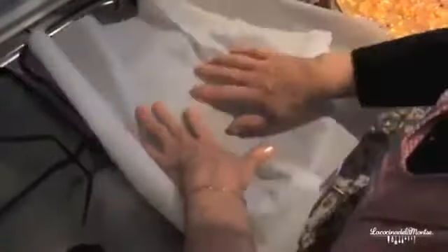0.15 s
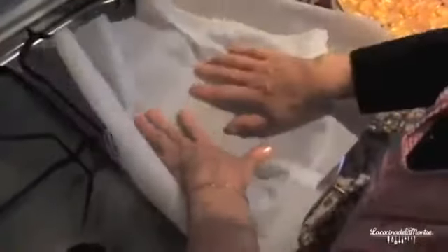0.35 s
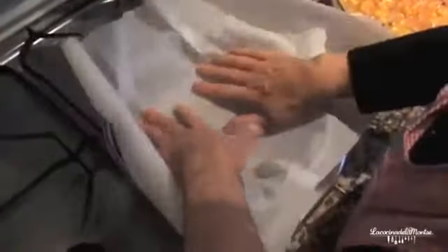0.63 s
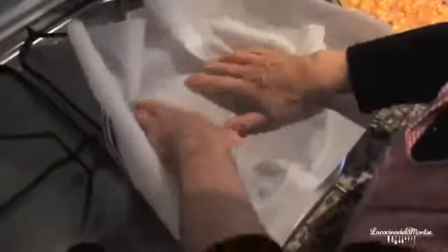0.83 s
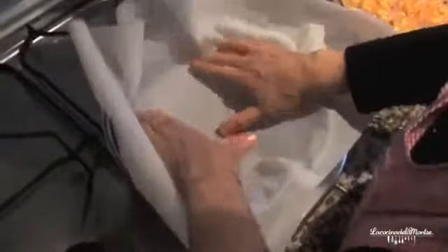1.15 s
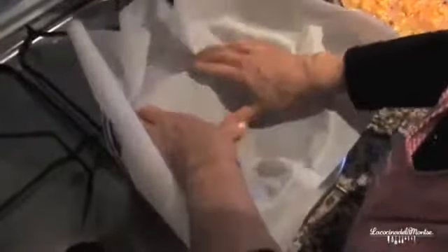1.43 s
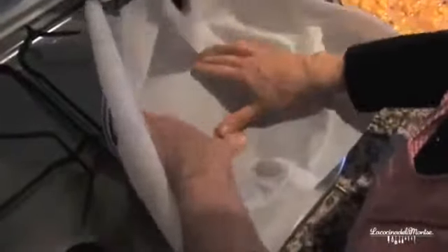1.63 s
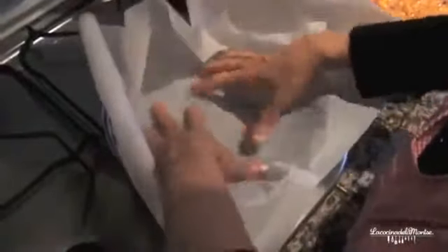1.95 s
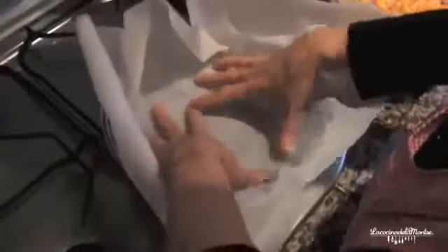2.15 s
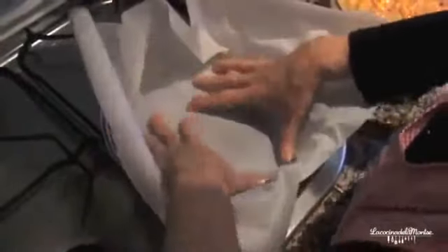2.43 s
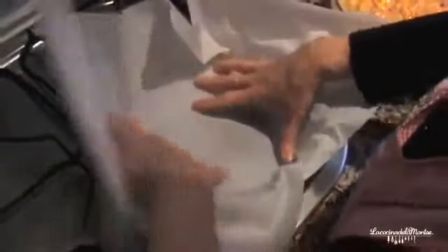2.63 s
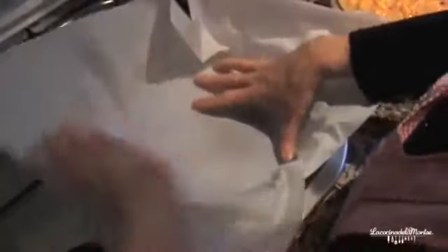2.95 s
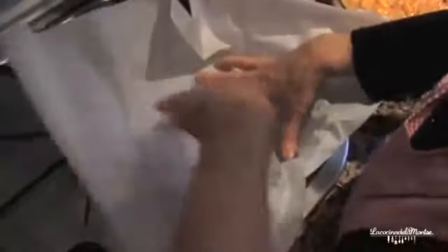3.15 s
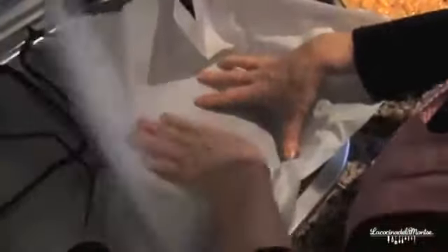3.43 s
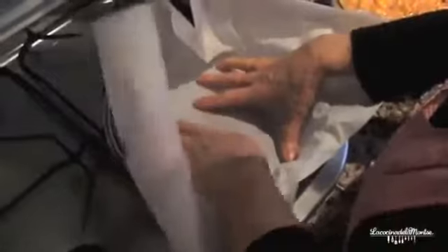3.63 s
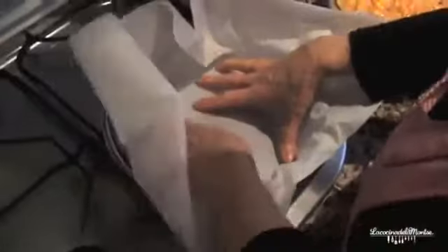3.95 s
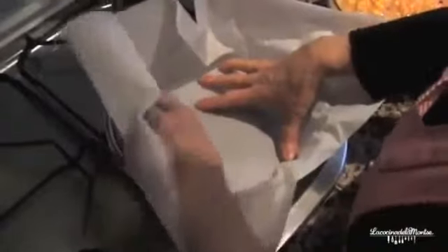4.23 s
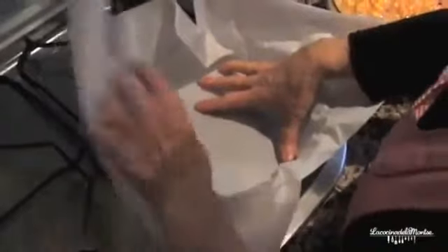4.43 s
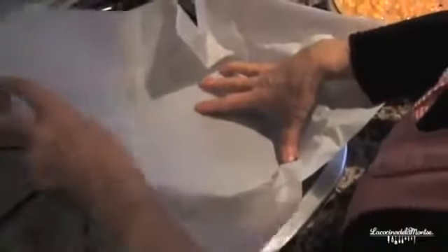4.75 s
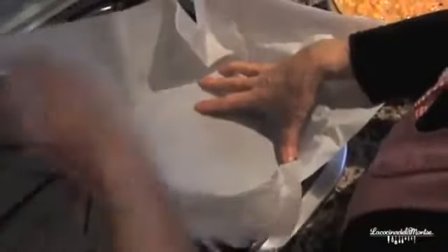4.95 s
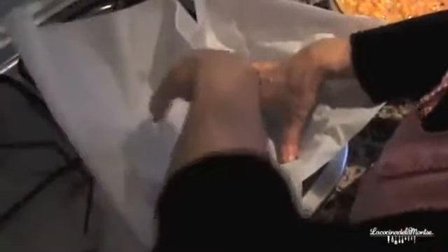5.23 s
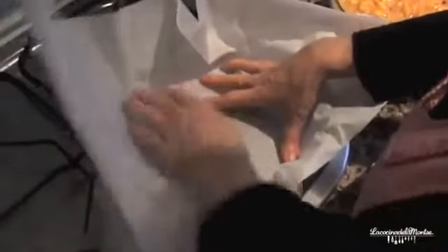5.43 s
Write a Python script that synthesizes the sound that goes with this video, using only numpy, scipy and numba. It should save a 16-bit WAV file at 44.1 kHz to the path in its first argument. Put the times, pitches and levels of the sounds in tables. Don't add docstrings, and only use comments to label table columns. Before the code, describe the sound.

Stiff baking paper is pressed by hand into a metal tin, heard very close in a small, hard-walled kitchen with a short bright tail and faint appliance hum. From 0 s a loud, dense, dry crackle of tiny creases runs in irregular bursts, dotted with sharp high snaps and cracks, hollow mid-pitched pops and lower panel flaps. Around 1.9 and 2.3 s the tin knocks dully on the counter, with a slight ring and chatter. The crackle swells near 3 s, with a buzzing rattle, then turns to sparser, brief ticks as the sheet springs loose. Tiny dips occur at 3.4 and 3.5 s before a sudden snap. From 3.5 to 5.1 s vigorous creasing returns, with more light knocks near 3.7 s and quick pops and rattles. It thins sharply after 5.1 s; from 5.3 s only a faint, patchy palm rub remains, fading into quiet hum by 5.5 s.

```python
import sys
import numpy as np
from scipy import signal
from scipy.fft import rfft, irfft
from scipy.io import wavfile
from scipy.ndimage import uniform_filter1d
from numba import njit

SR = 44100
rng = np.random.default_rng(int(sys.argv[2]) if len(sys.argv) > 2 else 0)


def field_ratio(decibels):
    return 10 ** (np.asarray(decibels, dtype=float) / 20)


def store_wav(level_fs):
    pcm = np.round(np.clip(np.atleast_2d(level_fs), -1, 1) * 32767)
    wavfile.write(sys.argv[1], SR, pcm.T.astype(np.int16))


N = 246519
LEFT_RIGHT = np.array([[1], [-1]])


def table(rows, hz):
    f, db = np.transpose(rows)
    return np.interp(np.log(np.maximum(hz, 1)), np.log(f), db)


def shape(x, rows):
    return irfft(rfft(x) * field_ratio(table(rows, np.fft.rfftfreq(N, 1 / SR))), N)


def coloured(rows):
    return shape(rng.standard_normal(N), rows)


def level(x, db):
    return x * field_ratio(db) / np.sqrt(np.mean(x ** 2))


def walk(rate):
    hold = int(SR / rate)
    steps = np.repeat(rng.standard_normal(N // hold + 1), hold)
    return uniform_filter1d(steps, hold)[:N]


@njit
def grains(start, hz, t60, size, phase, rise):
    out = np.zeros(N)
    for k in range(len(start)):
        turn = np.exp(2j * np.pi * hz[k] / SR - np.log(1000) / (t60[k] * SR))
        tone = size[k] * np.exp(1j * phase[k])
        shut, closing = 1., np.exp(-hz[k] / (rise * SR))
        for i in range(start[k], min(N, start[k] + int(t60[k] * SR))):
            out[i] += tone.imag * (1 - shut)
            tone, shut = tone * turn, shut * closing
    return out


def ring(s, hz, t60, db, rise=0.24):
    start = np.clip(s * SR, 0, N - 1).astype(np.int64)
    phase = rng.uniform(0, 2 * np.pi, len(start))
    return grains(start, np.clip(hz, 20, .45 * SR), t60, field_ratio(db), phase, float(rise))


def hands(s):
    # time in seconds, pressure in dB, breadth in dB.
    press = [(0.0, -20.5, 3.5), (0.45, -22, -0.5), (1.75, -23.5, -2.5), (2.42, -26, -1), (2.56, -26, -2),
             (3.069, -21, 2.5), (3.109, -33, 1), (3.491, -50.5, -2.5), (3.518, -22, -7.5),
             (3.92, -23, -0.5), (4.1, -29, -3.5), (4.4, -23, -1), (4.75, -29, 4.5), (5.1, -22.5, 1),
             (5.14, -33, 8), (5.29, -40, 8), (5.32, -63, 1), (5.59, -61.5, 5)]
    # middle in seconds, change in dB, half length in seconds, added breadth in dB.
    grips = [(0.025, -9.5, 0.014, 7), (0.37, 1.5, 0.062, 0), (0.42, -3, 0.03, -3.5),
             (0.658, -6.5, 0.025, -3), (1.824, -3.5, 0.027, -1.5), (1.934, 0.5, 0.043, 0.5),
             (2.246, -7, 0.019, 9), (2.28, 2.5, 0.076, 0.5), (2.458, 5, 0.12, -2), (2.54, -7, 0.043, -3),
             (3.206, 12, 0.018, 4.5), (3.327, 2.5, 0.056, -3), (3.414, 12.5, 0.045, -2),
             (3.538, 7, 0.011, -6), (3.56, -4, 0.14, 10), (3.729, -0.5, 0.07, 5), (3.843, -3.5, 0.037, 3),
             (3.948, 5, 0.049, 1), (4.548, -4, 0.1, -2), (4.62, 6, 0.018, -3), (4.697, -7, 0.038, -2),
             (4.753, 6.5, 0.011, -10), (4.8, -3, 0.014, 1), (4.819, 4.5, 0.012, 1.5),
             (4.835, 1.5, 0.011, 4), (4.889, 0, 0.035, -3), (4.93, 4.5, 0.013, 6), (4.949, -0.5, 0.015, 8),
             (5.078, -7.5, 0.032, -1.5), (5.18, -2.5, 0.023, 5.5), (.003, -12, 0.0041, 2),
             (0.286, -1, .07, -1.5), (0.756, 4, 0.034, 0.5), (0.992, -2.5, 0.039, 3),
             (1.1, -5.5, 0.027, -4), (1.202, -1.5, 0.064, 0), (1.256, -1, 0.023, 4),
             (1.374, 1.5, 0.037, 1.5), (1.68, 0.5, 0.034, 3.5), (2.086, -2.5, 0.018, 3),
             (2.66, -1, 0.05, 0), (3.382, -11, .02, 1), (4.11, 2, 0.045, 0.5), (4.272, 3, .03, 5),
             (5.23, 1.5, .03, -1)]
    t, press_db, broad_db = np.transpose(press)
    press_db, broad_db = np.interp(s, t, press_db), np.interp(s, t, broad_db)
    for at, change_db, half_s, more_db in grips:
        near = np.clip(1 - abs(s - at) / half_s, 0, 1)
        press_db = press_db + change_db * near
        broad_db = broad_db + more_db * near
    return press_db, broad_db


def crackle(cycles=9.2, uneven_db=1.23, burst_db=1.12, flurry_db=1.0, patch_db=1.04, low_patch_db=1.0,
            gain_db=-6.5, count=60000):
    # pitch in Hz, level in dB per Hz.
    paper_tone = [(88, -53), (150, -16.5), (320, 5.5), (450, -19), (680, 6.5), (1000, 1.5), (1500, 6),
                  (6610, 10.5), (9780, 7), (10500, -7.5), (13600, -48.5), (22000, -120)]
    when, size, luck = rng.random((count, 3)).T
    s = when * N / SR
    hz = 150 * (10800 / 150) ** (size ** .5)
    press_db, broad_db = hands(s)
    octave = np.log2(hz / 2800)
    tilt = np.clip(-octave / 3.5, 0, 1) * broad_db
    tilt += np.clip(octave / 2.4, 0, 1) * (-1.16 * broad_db + 5.0)
    at = (s * SR).astype(int)
    patches = np.array([walk(45) for _ in range(12)])[(size * 12).astype(int), at]
    db = table(paper_tone, hz) + 10 * np.log10(hz / 3000) + press_db + tilt
    db += burst_db * walk(55)[at] + flurry_db * walk(300)[at]
    db += (patch_db + low_patch_db * (hz < 900)) * patches
    db -= uneven_db * np.log(luck)
    return ring(s, hz, cycles / hz, db + gain_db)


def thrum(share=0.3, gain_db=-47.0, rise_db_per_s=1.13, flicker_db=-2.5):
    t = np.arange(N) / SR
    press_db, broad_db = hands(t)
    db = share * (press_db + broad_db) + flicker_db * walk(17) + rise_db_per_s * t
    rumble = coloured([(15, -16.0), (30, -6), (70, -5.0), (130, 0.5), (220, -4.5), (400, -28.5)])
    return level(rumble, gain_db) * field_ratio(db)


def kitchen():
    # pitch in Hz, level in dB per Hz.
    hum_tone = [(18, -31.5), (30, -15), (130, 1.5), (636, -5.5), (718, -18), (852, -7), (1360, -18.5),
                (3190, -25.5), (10300, -25.5), (13400, -60), (22000, -120)]
    mid, side = coloured(hum_tone), coloured(hum_tone)
    return level(mid + 0.14 * side * LEFT_RIGHT, -54.5)


def snaps(spread_s=0.0022, late_rise_db=1.5, width=0.3, tick_share=0.52, cycles=4.8, gain_db=-10.5, count=30):
    # start in seconds, peak in dB, pitch in Hz, low body in dB.
    pressed = [(0.0438, 6.5, 7450, -18), (0.2234, -4, 7160, -22), (0.2848, -15, 4810, -25),
               (0.3626, -11, 8000, -32), (0.5197, -11, 2820, -27), (0.5661, -5, 5700, 1.5),
               (0.6778, -12, 3670, -7), (0.7986, -8, 3900, 1), (0.844, -14, 4650, -20),
               (0.8799, 4, 4930, -17.5), (1.052, -10, 6800, -21), (1.1268, -10.5, 5930, -11),
               (1.1578, -17, 4800, 3), (1.2855, -7, 6600, -22), (1.3414, -10, 6740, -17),
               (1.4546, -8, 7000, -27), (1.5219, 0, 4760, -15), (1.7564, 4, 6500, -10),
               (1.8033, -9, 7200, -30), (1.8985, -1.5, 5500, -33), (1.938, -1.5, 6800, -19),
               (2.0458, 0, 7000, -24), (2.157, 5, 6600, -45), (2.2386, 4, 9100, -34),
               (2.2555, -11, 5800, 2), (2.339, 0, 5670, -9), (2.6084, -6.5, 4340, -37),
               (2.774, 0.5, 6600, -16), (2.9204, 5, 6400, -17.5), (2.9682, 2.5, 4530, -38)]
    springing = [(3.1353, -10, 3130, -1), (3.162, 0, 6900, -24), (3.192, 1, 7500, -19),
                 (3.2363, -6, 5900, -16), (3.256, -8, 6270, -40), (3.263, -1, 6800, -37),
                 (3.3175, -8.5, 4530, -38), (3.3323, -13, 3300, -19), (3.3991, 4.5, 8500, -22),
                 (3.402, -6, 4500, -26), (3.506, -6.5, 8330, -16.5), (3.5156, 5, 6360, -35),
                 (3.53, -18, 5200, -24), (3.538, -19, 4800, -31), (3.5835, -6, 2400, -19),
                 (3.6016, -0.5, 7500, -28), (5.109, -4, 5500, -27), (5.219, -17, 1980, -16.5),
                 (5.241, -11, 6940, -29), (5.2026, -19, 4200, -26), (5.454, -41, 5050, -2.5)]
    creased = [(3.6465, 0, 6860, -27), (3.676, -8, 5200, -4.5), (3.7658, 7.5, 6350, -21.5),
               (3.8082, 0, 5930, 0), (3.822, 5.5, 6800, -20), (3.8687, -6, 5370, -12),
               (3.8896, -20, 4840, -19), (4.034, -2.5, 5770, -6.5), (4.0608, 2.5, 6600, -8.5),
               (4.1784, 0, 6600, -25), (4.1962, -6, 2360, -19), (4.255, -12, 1200, 3),
               (4.3014, 4.5, 6700, -22), (4.345, -13, 6730, -20), (4.3867, -1, 4270, -11),
               (4.5241, -16, 6450, -18), (4.5482, -1.5, 6500, -31), (4.6122, -5, 4800, -2.5),
               (4.632, -16.5, 2420, -5), (4.717, -1, 8100, -26), (4.745, -19, 2550, -10),
               (4.7522, -5, 2510, -11), (4.787, -12, 2000, -22), (4.812, -13, 4800, -21),
               (4.851, -11, 3300, -22), (4.8746, 4, 6660, -15), (4.9152, 1, 8500, -22),
               (4.9516, 0.5, 5700, -36), (5.0374, -11, 4340, -19), (5.0796, -12, 5400, -29)]
    groups = (pressed, springing, creased)
    s, peak_db, hz, body_db = np.repeat(np.vstack(groups).T, count, axis=1)
    stray, delay, uneven = rng.standard_normal((len(s), 3)).T
    pitch = np.minimum(hz * 2 ** (width * stray), 10500)
    brief = np.repeat([1, tick_share, 1], [count * len(rows) for rows in groups])
    late = brief * abs(delay) ** 1.4
    crisp_db = peak_db + gain_db + late_rise_db * late + 0.53 * uneven
    crisp = ring(s + spread_s * late, pitch, cycles / pitch, crisp_db)
    low = 800 * 2 ** (0.51 * stray)
    body = ring(s + 0.00195 + 0.00407 * abs(uneven), low, 6.4 / low, peak_db + body_db - 20.0)
    return crisp + body


def volley(rows, octaves, spread_s, cycles, gain_db, count=12):
    s, peak_db, hz = np.repeat(np.transpose(rows), count, axis=1)
    stray, delay = rng.standard_normal((len(s), 2)).T
    pitch = np.minimum(hz * 2 ** (octaves * stray), 10500)
    late = delay ** 2
    return ring(s + spread_s * late, pitch, cycles / pitch, peak_db + gain_db - 1.7 * late)


def pops():
    # start in seconds, peak in dB, pitch in Hz.
    pop_rows = [(0.0382, -9.5, 1960), (0.2169, -11, 2460), (0.4314, -11, 1910), (0.532, -6, 2010),
                (0.6769, -15.5, 1700), (0.8809, -20, 2180), (0.946, -4, 2930), (1.1174, -10, 2600),
                (1.1633, -9, 2780), (1.6322, -12.5, 1680), (1.8507, -12, 2980), (1.872, -13, 2200),
                (1.9614, -31, 2020), (2.0153, -15, 1870), (2.3396, -10, 2570), (2.4289, -21, 1850),
                (2.4598, -24, 2510), (2.5501, -16.5, 2680), (2.6908, -13, 1800), (2.726, -16.5, 1680),
                (2.7744, -9.5, 2060), (2.8714, -27, 2450), (2.9282, -12, 2550), (3.0041, -26, 1800),
                (3.1935, -15, 2760), (3.26, -19, 2830), (3.3179, -13, 2650), (3.3997, -18, 2650),
                (3.4955, -21, 2430), (3.5163, -9.5, 2330), (3.5855, -15.5, 1430), (4.0188, -7, 2920),
                (4.1599, -15, 1990), (4.1954, -8, 2400), (4.2467, -11, 2480), (4.281, -10.5, 2860),
                (4.357, -11, 2250), (4.5695, -11, 1980), (4.6126, -12, 2400), (4.7007, -15, 2390),
                (4.7387, -13.5, 2870), (4.787, -13, 1920), (4.8416, -19.5, 1560), (4.9433, -16, 2790),
                (5.0275, -15, 2680)]
    return volley(pop_rows, octaves=0.14, spread_s=.004, cycles=19.3, gain_db=-9.5)


def flaps():
    # start in seconds, peak in dB, pitch in Hz.
    flap_rows = [(0.041, -22, 1270), (0.119, -14.5, 970), (0.33, -20, 653), (0.447, -13, 950),
                 (0.533, -10.5, 1010), (0.698, -17, 810), (0.824, -22, 885), (0.907, -14, 1040),
                 (1.033, -13, 697), (1.078, -25, 859), (1.128, -15, 676), (1.32, -21, 813),
                 (1.519, -14.5, 700), (1.905, -26, 714), (2.262, -14, 730), (2.305, -12, 760),
                 (2.55, -21.5, 573), (2.783, -25, 735), (2.924, -10, 1250), (3.4, -17, 695),
                 (3.51, -22.5, 680), (3.572, -11.5, 1240), (3.644, -12, 1110), (3.676, -19, 1030),
                 (3.725, -10, 1250), (3.764, -17, 680), (3.814, -15, 687), (3.898, -10, 1130),
                 (4.048, -16.5, 985), (4.195, -17, 985), (4.25, -9, 1230), (4.375, -14, 1090),
                 (4.422, -18, 1140), (4.631, -15.5, 784), (4.717, -18, 1100), (4.871, -23, 690),
                 (4.911, -19, 855), (4.99, -23, 875), (5.054, -18, 554), (5.093, -17, 980)]
    return volley(flap_rows, octaves=.1, spread_s=.007, cycles=17.7, gain_db=-11.)


def cracks():
    # start in seconds, peak in dB, pitch in Hz.
    crack_rows = [(0.0438, -8, 7590), (0.1057, -20, 4770), (0.157, -15, 6650), (0.204, -4, 7100),
                  (0.2224, -4, 6730), (0.2848, -11, 4830), (0.3411, -11, 4540), (0.4474, -14, 7130),
                  (0.5197, -13, 7110), (0.5661, -1, 5810), (0.6205, -13, 7530), (0.6764, -12, 4000),
                  (0.6943, 1, 6730), (0.741, 0, 8940), (0.8275, -17.5, 4860), (0.8495, -6, 9060),
                  (0.8719, -14, 4730), (0.9457, -14, 6420), (1.0016, -4, 6570), (1.0221, -4, 4730),
                  (1.051, -11, 6090), (1.075, -9, 6650), (1.1109, -15, 6410), (1.1268, -8, 5810),
                  (1.1563, -12, 4860), (1.1717, -14, 7050), (1.218, -17, 4580), (1.2844, -13, 5700),
                  (1.2984, -5, 6620), (1.3199, -6, 5620), (1.3414, -13, 6490), (1.3574, -10, 5110),
                  (1.3974, -4, 5800), (1.4546, -6, 6720), (1.523, -3, 4800), (1.5958, -21, 4020),
                  (1.6336, -3, 6060), (1.7195, -4, 7300), (1.7564, -13, 6390), (1.8033, 2, 7120),
                  (1.8396, 4, 6590),
                  (1.8983, -6, 5100), (1.9387, -6, 6360), (1.9896, -10, 6340), (2.047, -5.5, 7000),
             (2.1503, -7, 5960), (2.1837, 3, 6500), (2.256, 3, 5030), (2.2835, -13, 5090),
             (2.6097, -2, 4500), (2.7743, -6, 6580), (2.8751, -10, 6480), (3.162, -15, 5470),
             (3.1929, -14, 7310), (3.2355, -7, 5920), (3.2607, -8, 6350), (3.3171, -17, 3720),
             (3.399, -18, 8630), (3.5107, -3.5, 6400), (3.573, -10, 6690), (3.603, -11, 5170),
             (3.6429, 2, 7140), (3.6773, -5, 4950), (3.7571, -11, 8180), (3.8684, -6.5, 4970),
             (4.033, -10, 5840), (4.1353, 6, 7000), (4.1597, -13, 7960), (4.1782, -13, 6430),
             (4.253, 2, 8290), (4.3438, -7, 6800), (4.5478, -15, 4000), (4.6057, -9, 4790),
             (4.6995, -15, 8290), (4.7159, -10, 8090), (4.7459, 0, 6860), (4.7863, -9, 3550),
             (4.8132, -5, 7000), (4.8506, -7, 3300), (4.8701, -4, 6970), (4.9514, 2, 5850),
             (5.0372, -5, 4340), (5.108, -15, 5060)]
    return volley(np.array(crack_rows), octaves=0.18, spread_s=0.0011, cycles=9.2, gain_db=-7.5)


def rattles():
    # start in seconds, peak in dB, pitch in Hz.
    buzzes = [(.058, -23, 752), (.3, -14, 1600), (.72, -24.5, 680), (.965, -21, 3580), (1.35, -10, 5100),
              (2.63, -12.5, 1930), (2.79, -16, 2120), (2.83, -9.5, 2490), (2.922, -19.5, 1230),
              (2.955, -17, 1190), (2.995, -4, 5140), (3.52, -21, 675), (3.91, -10, 2700),
              (4.255, -20, 1170), (4.612, -20, 2560), (4.635, -13.5, 2130), (4.785, -8.5, 1940),
              (4.812, -16, 2200), (4.84, -16, 1620), (4.912, -22, 860), (4.94, -24, 890), (4.99, -26, 815),
              (5.08, -5, 5100)]
    return volley(buzzes, octaves=0.073, spread_s=.016, cycles=28.6, gain_db=-10.5, count=20)


def knocks(tin_db=-15.0, rim_db=-9.5, boom_db=-3.0, rattle_s=0.008, count=7):
    # start in seconds, peak in dB, rim ring in dB, counter boom in dB.
    hits = [(1.897, -10, -2.5, -15), (4.275, -35, -1, -3), (1.94, -17.5, -9, -8), (2.256, -13, -2, -7),
            (2.297, -11.5, -7, -26), (2.352, -30, -8, 0.5), (2.734, -37, 8, -3.5), (3.674, -10, 3, -10.5),
            (3.7, -11, -20, -14), (3.755, -14.5, -16, -18)]
    # pitch in Hz, level in dB, time to fade by 60 dB in seconds.
    tin_floor = [(240, -1, 0.044), (335, -5, 0.13), (447, -9, 0.12), (571, -10, 0.098), (712, -2, 0.09),
                 (764, -2.5, 0.11), (840, -6.5, 0.045), (1042, 0, 0.077)]
    rim = [(5100, -3.5, 0.038), (4970, 3, 0.037), (6400, -1.5, 0.049)]
    counter = [(72, -10, 0.18), (100.7, -7.5, 0.31), (123.8, -7.5, 0.41), (178, -3, 0.13)]
    start, peak_db, ring_db, low_db = np.repeat(hits, count, axis=0).T
    parts = ((tin_floor, tin_db, .07, .16),
             (rim, rim_db + ring_db, .008, .16),
             (counter, boom_db + low_db, .04, .6))
    out = 0
    for modes, part_db, stray, rise in parts:
        hz, mode_db, t60 = np.tile(np.transpose(modes), len(start))
        detune, uneven, delay = rng.standard_normal((len(hz), 3)).T
        s = np.repeat(start, len(modes)) + rattle_s * delay ** 2
        db = np.repeat(peak_db + part_db, len(modes)) + mode_db + 0.71 * uneven
        out = out + ring(s, hz * (1 + stray * detune), t60, db, rise=rise)
    return out


def slide(patchy_db=4.5):
    # time in seconds, level in dB.
    strokes = [(5.3, -56), (5.34, -51), (5.4, -53.5), (5.44, -50.5), (5.47, -54), (5.5, -61), (5.54, -71),
               (5.59, -70)]
    # pitch in Hz, width in Hz, level in dB.
    rubbed = [(1310, 840, -5), (3100, 200, -12.5), (5000, 340, -3), (5500, 120, -10), (6600, 120, -18),
              (8500, 300, -21)]
    t, db = np.transpose(strokes)
    f, noise = np.fft.rfftfreq(N, 1 / SR), rfft(rng.standard_normal(N))
    hiss = 0
    for hz, width, top_db in rubbed:
        tone = irfft(noise * field_ratio(top_db) / (1 + (2 * (f - hz) / width) ** 2), N)
        hiss = hiss + tone * field_ratio(patchy_db * walk(25))
    return level(hiss, 0) * field_ratio(np.interp(np.arange(N) / SR, t, db, left=-90))


def room(x, early_db=-18.5, early_t60=0.018, dull_db=-8.0, dull_t60=0.52, bright_db=-8.0, bright_t60=0.11,
         count=7):
    t = np.arange(int(.5 * SR)) / SR

    def fade(db, t60):
        return field_ratio(db - 60 * t / t60) * np.sqrt(2 * np.log(1000) / (t60 * SR))

    place = np.arange(N) / SR / .06 % count
    low_pass = signal.butter(2, 2500, fs=SR, output="sos")
    out = np.array([x, x])
    for k in range(count):
        mid, side = rng.standard_normal((2, len(t)))
        noise = mid + .53 * side * LEFT_RIGHT
        dull = signal.sosfilt(low_pass, noise)
        echo = fade(early_db, early_t60) * noise + fade(dull_db, dull_t60) * dull
        echo += fade(bright_db, bright_t60) * (noise - dull)
        away = abs((place - k + count / 2) % count - count / 2)
        here = np.cos(np.pi / 2 * np.minimum(away, 1))
        out += signal.fftconvolve((x * here)[None], echo, axes=1)[:, :N]
    return out


def ports(x):
    # pitch in Hz, level in dB.
    side_tone = [(60, -6), (300, 0.5), (1500, -1.5), (2700, 0.5), (3400, 1.5), (4000, 1), (4900, -8),
                 (5800, -4.5), (8000, 2.5), (9500, -1.5), (10500, 1)]
    side = (x[0] - x[1]) / 2
    return x + (shape(side, side_tone) - side) * LEFT_RIGHT


def scene():
    # pitch in Hz, level in dB.
    sheet = [(100, -23.5), (250, -7), (340, -2), (440, -2.5), (520, 1), (600, -0.5), (690, 1.5),
             (790, -0.2), (1050, 1), (1450, 0.24), (2500, 1), (4200, -1), (20000, 1.6)]
    paper = shape(crackle() + snaps() + pops() + flaps() + cracks() + rattles(), sheet)
    near = ports(room(paper + knocks() + slide() + thrum()))
    bass = signal.sosfilt(signal.butter(1, 260, fs=SR, output="sos"), near)
    return (near + 0.055 * bass * LEFT_RIGHT) * field_ratio(.35 * LEFT_RIGHT) + kitchen()


def hush(x, gate_db=-86., depth_db=-14., size=1024):
    f, _, cells = signal.stft(x, SR, nperseg=size)
    strength = uniform_filter1d(abs(cells).mean(axis=0), size=3, axis=1)
    keep = np.clip(1 - (field_ratio(gate_db) / (strength + 1e-12)) ** 2, field_ratio(depth_db), 1)
    keep[f < 1200] = 1
    return signal.istft(cells * keep, SR, nperseg=size)[1][:, :N]


def band_limit(x):
    return signal.sosfilt(signal.butter(12, 11610, fs=SR, output="sos"), x)


def record(dry):
    # middle in seconds, half width in seconds, depth in dB.
    mutes = [
        (3.39, 0.0043, -42),
        (3.498, 0.0054, -9),
    ]
    t = np.arange(N) / SR
    mute_db = sum(db * np.exp(-((t - s) / half_s) ** 2) for s, half_s, db in mutes)
    x = hush(np.tanh(1.9 * dry * field_ratio(mute_db)) / 1.7)
    x = signal.sosfilt(signal.ellip(10, .3, 60, 10250, fs=SR, output="sos"), x)
    return band_limit(x)


dry = scene()
out = record(dry)
store_wav(out)
```